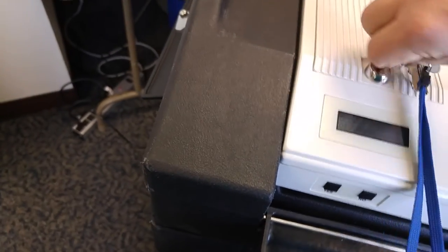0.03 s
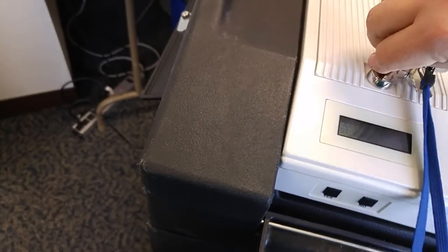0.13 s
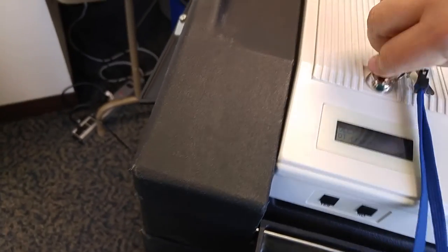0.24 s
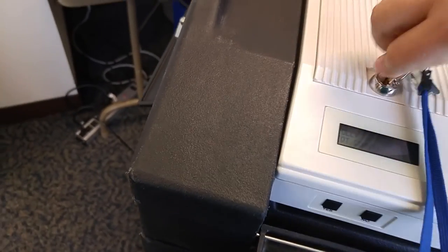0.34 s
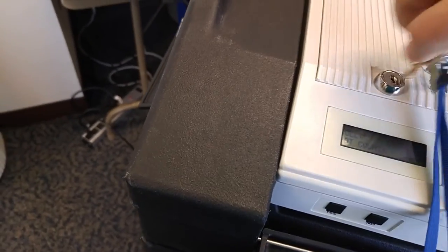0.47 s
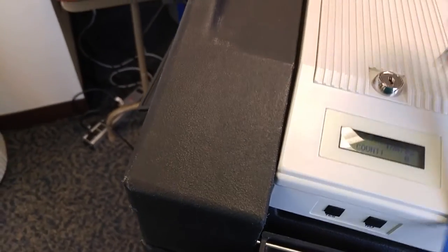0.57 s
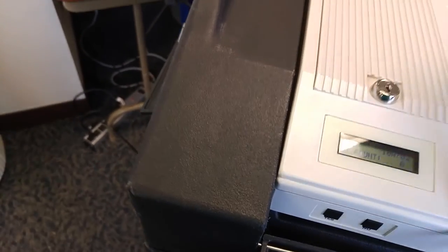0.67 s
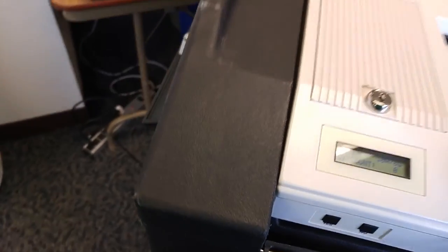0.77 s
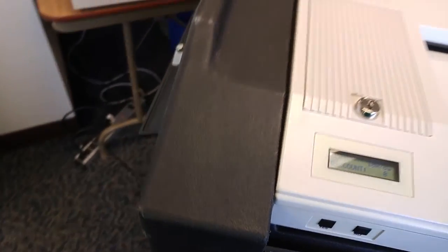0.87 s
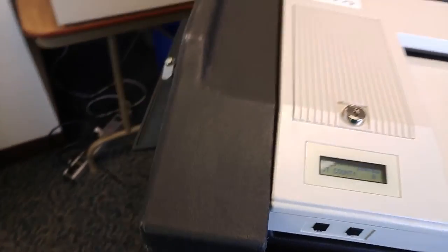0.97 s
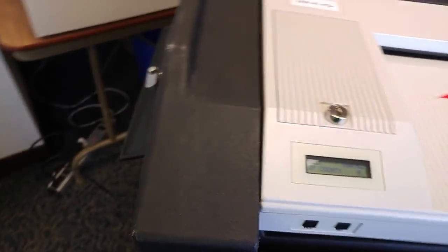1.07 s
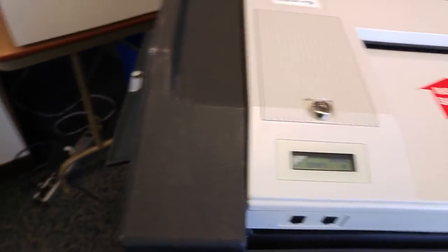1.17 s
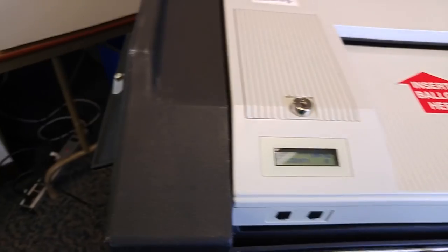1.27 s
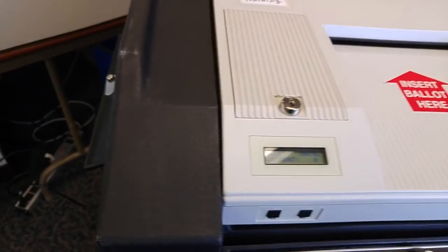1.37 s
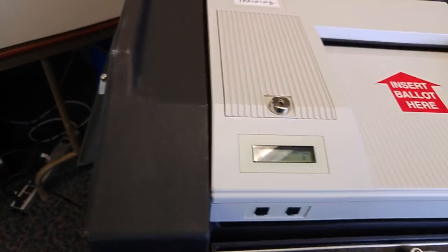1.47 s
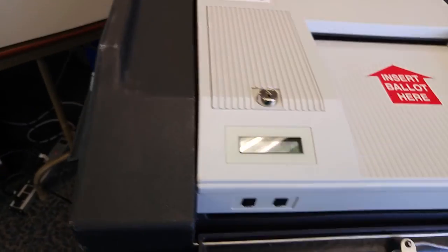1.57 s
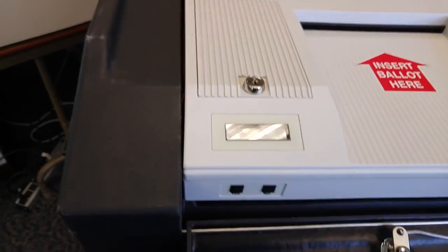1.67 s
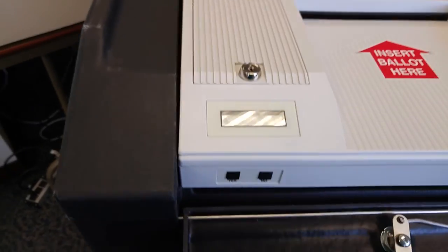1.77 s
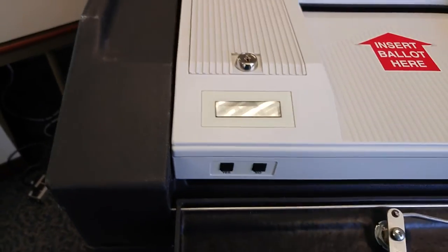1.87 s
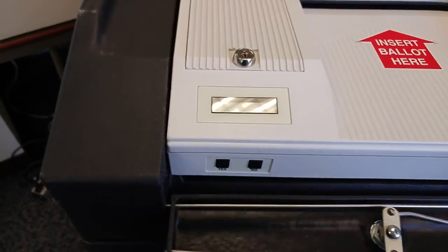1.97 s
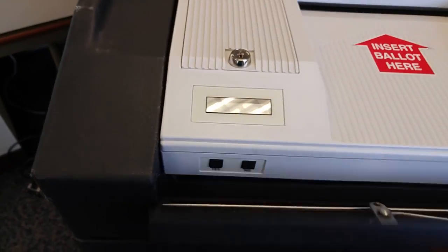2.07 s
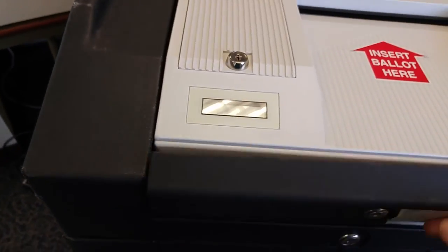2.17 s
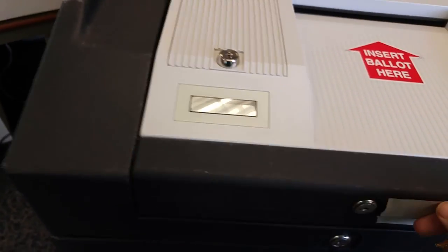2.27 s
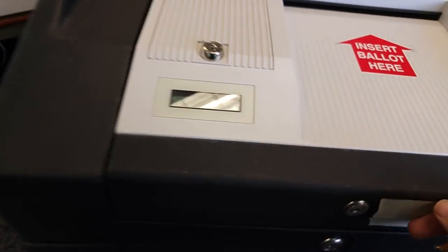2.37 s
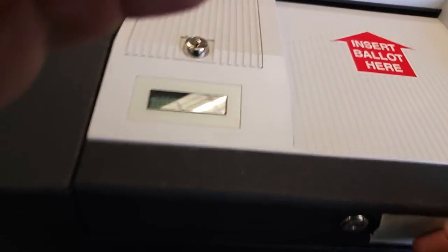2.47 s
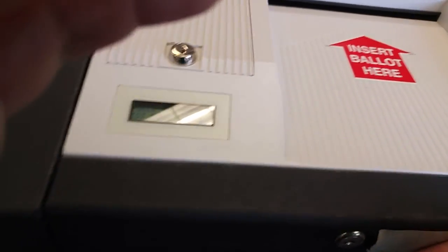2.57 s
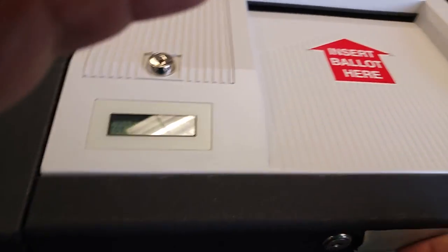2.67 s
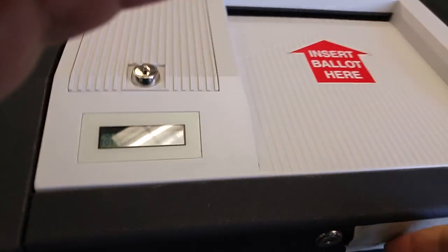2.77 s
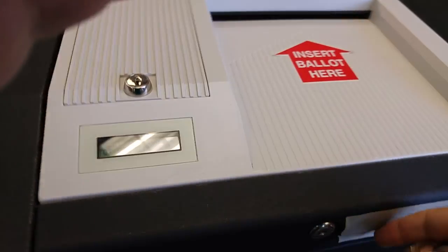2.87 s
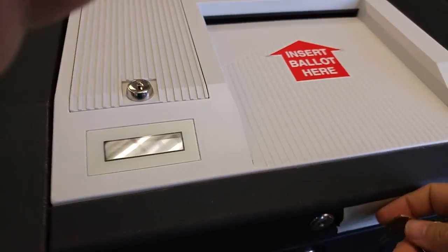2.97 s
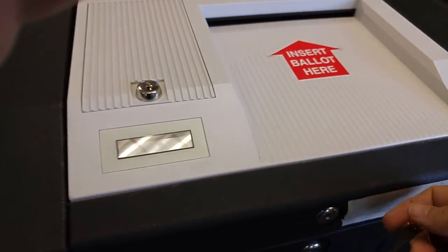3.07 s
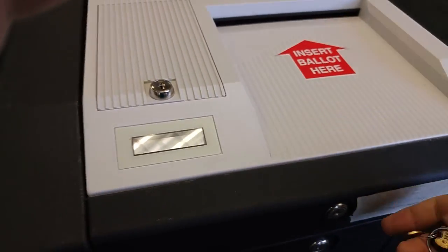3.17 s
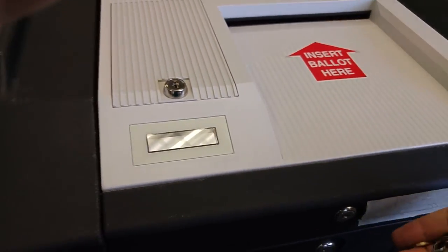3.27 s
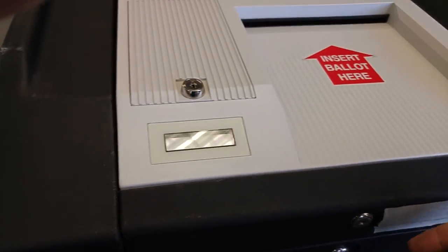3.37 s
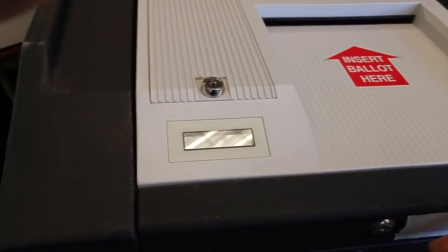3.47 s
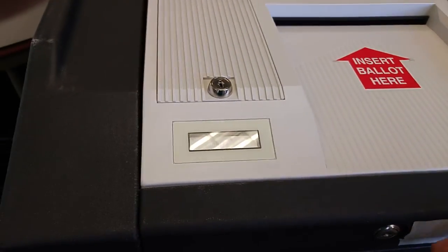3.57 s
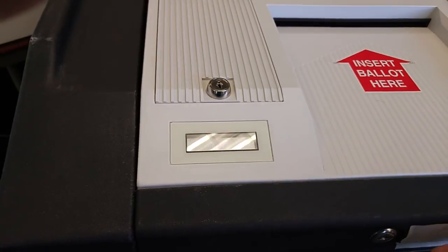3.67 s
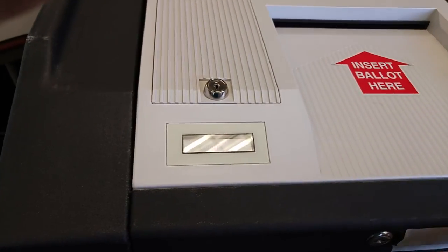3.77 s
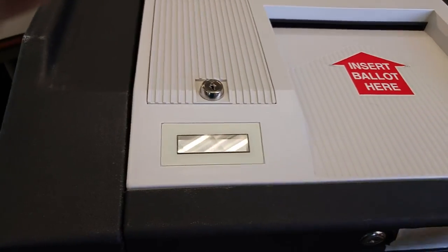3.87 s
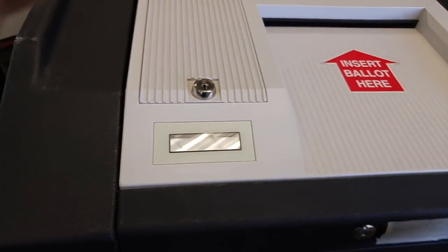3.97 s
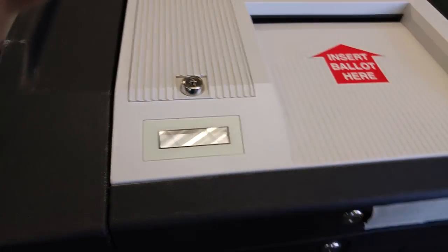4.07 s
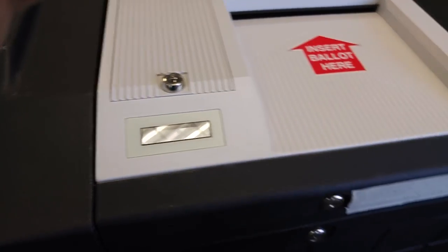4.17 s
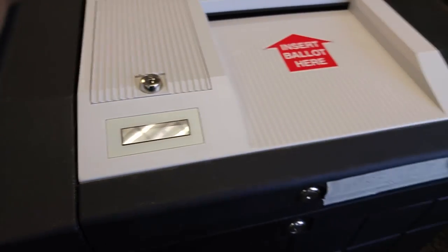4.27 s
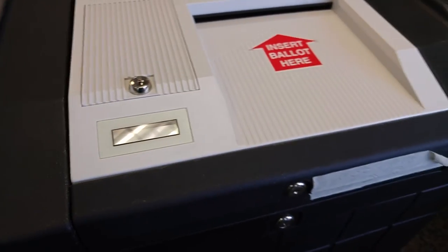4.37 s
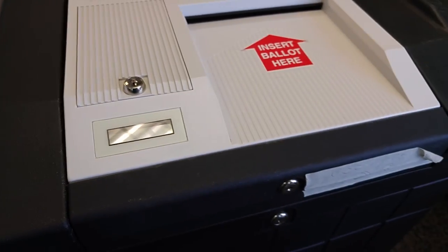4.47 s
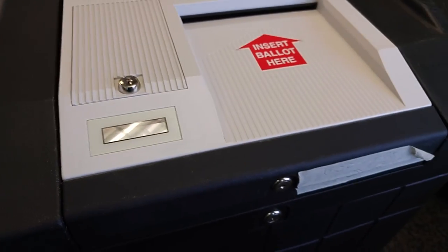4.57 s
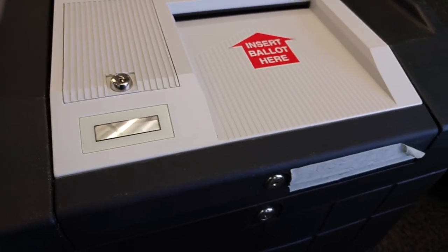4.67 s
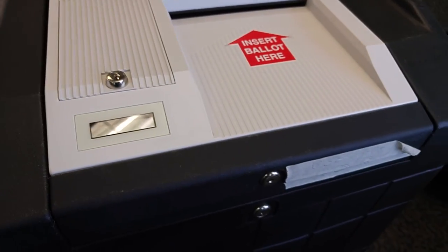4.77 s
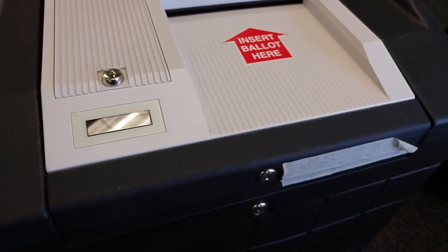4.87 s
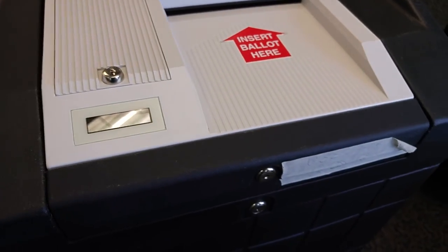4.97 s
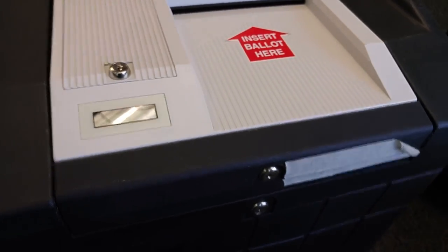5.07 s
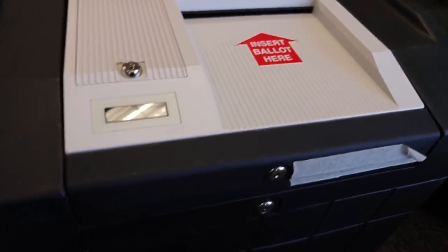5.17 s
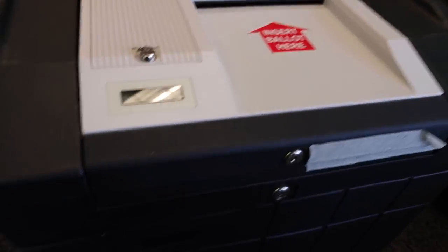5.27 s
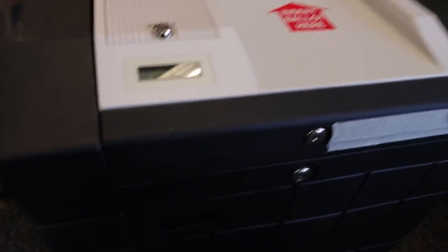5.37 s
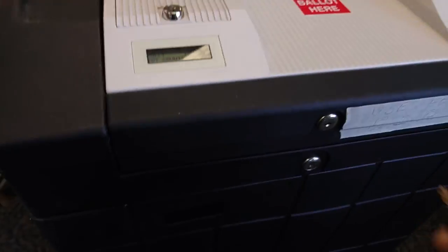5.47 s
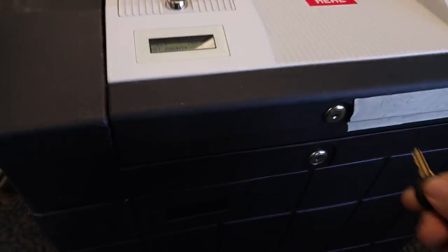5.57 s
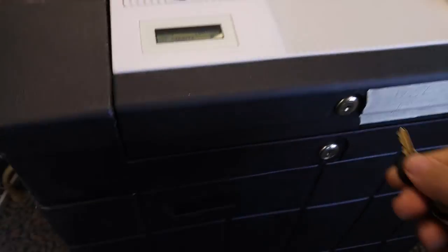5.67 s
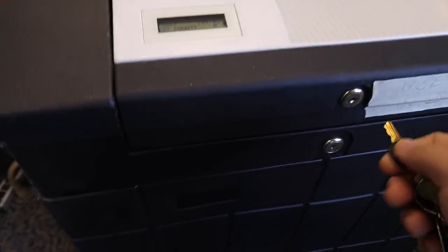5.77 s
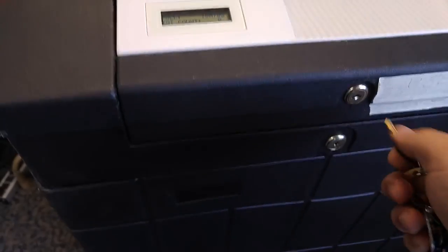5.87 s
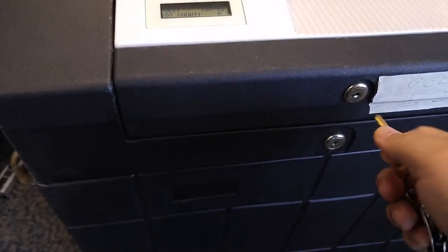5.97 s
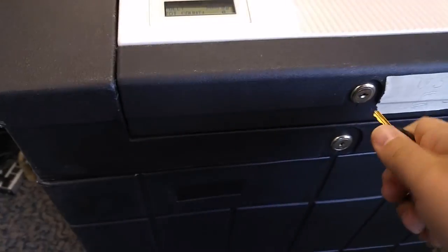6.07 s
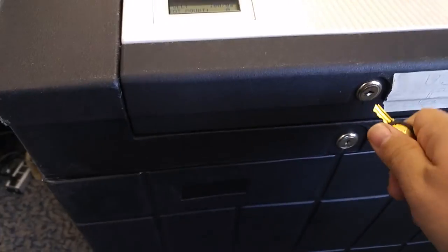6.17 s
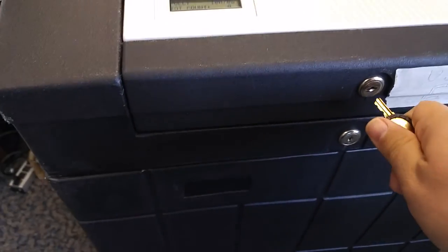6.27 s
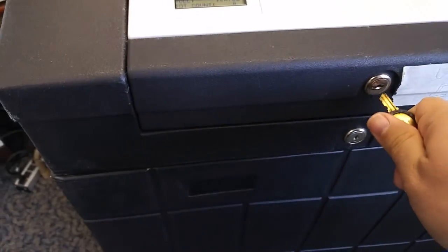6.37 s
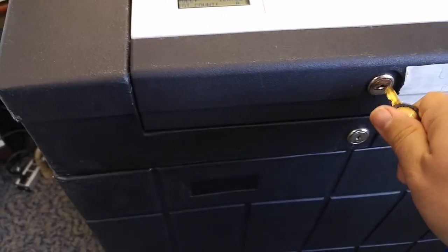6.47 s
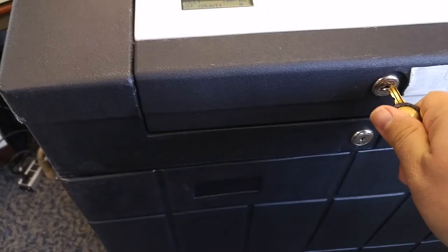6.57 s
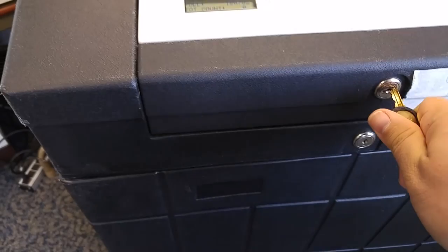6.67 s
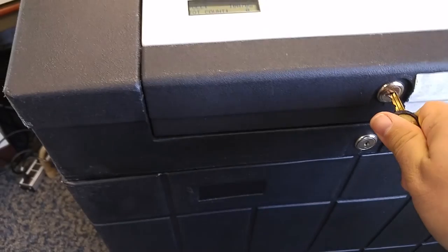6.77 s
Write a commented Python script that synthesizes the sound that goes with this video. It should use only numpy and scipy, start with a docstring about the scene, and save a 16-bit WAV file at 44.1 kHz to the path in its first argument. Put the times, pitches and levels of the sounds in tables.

```python
"""Keys at a plastic cabinet in a carpeted, ventilated room: steady air noise throughout.
A key is worked in a lock and pulled out: catches ring the barrel and panel, the bunch clashes and soft bumps follow.
The flap rattles and knocks shut: noise bursts and decaying modes of latch, flap and hollow body.
A lanyard brush, then keys sorted in the hand: clicks, scrape, chinks and choked ringing partials; another brush.
Last, a key is tapped dully against the next lock and pushed in, with a few catches and a short jingle."""
import sys
import numpy as np
from scipy import signal
from scipy.fft import rfft, irfft, next_fast_len
from scipy.io import wavfile

SR = 44100
rng = np.random.default_rng(int(sys.argv[2]) if len(sys.argv) > 2 else 0)


def output_pcm(signal):
    """Save a mono or channel-first signal as 16-bit PCM at the path in sys.argv[1].

    Samples are clipped to [-1, 1] before scaling.
    """
    pcm = np.clip(np.atleast_2d(signal).T, -1, 1) * 32767
    wavfile.write(sys.argv[1], SR, np.round(pcm).astype(np.int16))


N = 301203

# All levels are relative; the source functions add the final trim.
# Ventilation and hiss spectrum: f/Hz, level/dB
AIR_SPECTRUM = [(25, -45), (65, -17), (120, -25), (175, -10.5), (205, -14), (240, -11), (300, -20.5),
                (365, -13), (510, -34.5), (690, -18.5), (1000, -32), (2000, -41), (4000, -47.5),
                (7500, -45.5), (8600, -36.5), (11500, -52.5), (15500, -58)]
AIR_DB = -48
CUTOFF_HZ = 15900

# Hand bumps: t/s, level/dB
HAND_BUMPS = [(.465, -43.5), (.503, -41.5)]
# Bump spectrum: f/Hz, level/dB
BUMP_SPECTRUM = [(20, -10), (50, 3), (90, -2.5), (300, -44.5)]
# Lanyard brushing the hand: centre t/s, level/dB, 1/e half-width/s
LANYARD_BRUSHES = [(2.407, -53, 0.035), (5.605, -50, 0.036)]

# Dull taps of a firmly gripped key, the last ones on the lock: t/s, level/dB
KEY_TAPS = [(1.865, -46), (4.266, -41.5), (4.288, -38), (6.402, -44), (6.41, -31.5), (6.621, -36),
            (6.624, -28.5), (6.782, -36.5), (6.821, -41.5)]
# Lock barrel with a key against it: f/Hz, level/dB, t60/s
BARREL_MODES = [(735, -0.5, 0.037), (938, -4, 0.058), (1542, 3.5, 0.031), (2000, -14, 0.036),
                (2600, -5, 0.024), (3450, -14.5, 0.053), (5750, -8, 0.027)]
# Key or bolt catching in a lock: t/s, panel level/dB, metal crack level/dB
LOCK_CATCHES = [(.010, -34.5, -37), (.058, -30, -55), (0.107, -31.5, -34), (0.189, -33, -44),
                (.223, -33.5, -54), (0.289, -35.5, -39), (.326, -27.5, -60), (.393, -35, -29.5),
                (.425, -41, -39.5), (.935, -49.5, -49), (1.608, -52, -49), (1.865, -46, -64),
                (6.623, -48, -29), (6.653, -41.5, -66), (6.697, -44.5, -60)]
CATCH_THUD_DB, CATCH_RING_DB = -4.5, -12.5  # hollow body, barrel; re panel

# Flap touching, then seating in its latch: touch t/s, delay to seating/s, body level/dB, latch crack level/dB
FLAP_SLAMS = [(1.939, 0.0034, -31.5, -22), (1.997, 0.0096, -30.5, -20), (2.049, 0.0058, -26, -12),
              (2.108, .008, -17, -5.5), (2.140, 0.0017, -37, -16.5)]
TOUCH_THUD_DB, TOUCH_CLACK_DB, TOUCH_CRACK_DB = -10.5, -1, -7.5  # re slam levels
SEAT_THUD_DB = -2  # re body level
BOUNCE_DELAY_S = .007  # after seating
BOUNCE_THUD_DB, BOUNCE_CLACK_DB, BOUNCE_CRACK_DB = -1.5, -15.5, -15  # re slam levels
# Cabinet walls: f/Hz, level/dB, t60/s
CABINET_WALL_MODES = [(168, -17, .28), (242, -1, .22), (275, -1, .2), (309, 0, .22), (345, -4, .18),
                      (409, -2, .19)]
# Flap: f/Hz, level/dB, t60/s
CABINET_FLAP_MODES = [(605, -6, .14), (641, 0, .22), (703, 0, .21), (760, -6, .14), (842, -3, .17),
                      (945, -8, .16), (1006, -7, .17), (1070, -9, .16), (1437, -11, .1)]
# Metal latch: f/Hz, level/dB, t60/s
METAL_LATCH_MODES = [(4925, 9.5, 0.049), (7550, -1, 0.13), (8350, 7.5, 0.081), (8900, 10, 0.11),
                     (9700, 0.5, 0.15), (15500, -16, .17)]
# Dense, damped noise of the hollow body: f/Hz, level/dB
THUD_SPECTRUM = [(30, -20.5), (60, -12), (130, -9.5), (220, -1.5), (420, 2.5), (520, -5.5), (1000, -25)]
# Same for the panel: f/Hz, level/dB
PANEL_SPECTRUM = [(300, -11), (520, -27.5), (650, 11.5), (900, 2.5), (1300, -2), (1900, -12), (3000, -12),
                  (6000, -28)]
# Same for the metal crack: f/Hz, level/dB
CRACK_SPECTRUM = [(600, 3.5), (1500, 1), (2600, -1), (3500, 1), (5000, 2), (6200, 2.5), (7300, 7.5),
                  (7800, 0.5), (8500, 11), (10000, 2.5), (12000, -1.5), (15500, -15.5)]

# Motion of the bunch: start t/s, end t/s, vigour level/dB, blade clack level re click/dB (high: tight grip)
BUNCH_SHAKES = [(0, 0.437, -44.5, -25), (0.547, 0.63, -46.5, -10), (0.724, 0.92, -38, -13),
                (1.244, 1.554, -60.5, -25), (2.73, 2.933, -56, -12), (3.077, 3.246, -43.5, -21),
                (3.41, 3.485, -44, -20), (3.53, 3.66, -41, -34), (3.864, 3.9, -41.5, -33),
                (4.131, 4.233, -44.5, -47), (4.25, 4.314, -38, -12), (4.643, 4.747, -45.5, -22.5),
                (4.84, 4.926, -39, -28), (5.008, 5.12, -44.5, -21), (5.149, 5.22, -30.5, -31),
                (5.30, 5.692, -62, -6), (6.81, 6.83, -42, -14.5)]
SWELL_DB_PER_S, SETTLE_DB_PER_S = 345, 314  # before and after each shake
RESTLESS_DB, HELD_S = -56.5, (2.7, 5.7)  # vigour floor while in the hand
JOSTLES_PER_S = 36
JOSTLE_DB, JOSTLE_SPREAD_DB = 1.5, 5.5  # re vigour; +/- spread
JOSTLE_TINK_DB = -8  # re click, before spread
# Hard, damped edge-on-edge hits: t/s, level/dB
EDGE_CLICKS = [(.002, -29), (0.084, -31.5), (0.199, -29.5), (.227, -29.5), (.326, -25.5), (.39, -25),
               (0.605, -24.5), (.77, -26), (.879, -25), (0.903, -22.5), (0.933, -26.5), (.95, -30),
               (.98, -36.5), (3.075, -33), (3.51, -25), (3.539, -24), (3.543, -23), (3.553, -24.5),
               (3.605, -26.5), (3.739, -32), (4.133, -36), (4.286, -31), (4.691, -20), (5.02, -25),
               (5.038, -25), (5.112, -25), (5.189, -25), (5.201, -24), (6.624, -27.5)]
CLICK_TINK_DB = -17  # tink re click
# Key swinging free: t/s, tink level/dB, ring level/dB, time until stopped/s
FREE_CHIMES = [(0.388, -35, -33, 0.046), (.584, -38, -47, 0.091), (0.726, -24.5, -30, 0.056),
               (.961, -26.5, -57, .02), (1.314, -62, -54, 0.055), (3.092, -40, -41, 0.028),
               (3.173, -47, -31.5, 0.025), (3.566, -40, -34, .03), (3.59, -24.5, -30, 0.019),
               (3.656, -23, -52, .06), (3.896, -20.5, -43, 0.037), (4.08, -21.5, -45, .03),
               (4.309, -24.5, -35, .03), (4.513, -31.5, -50, 0.027), (4.854, -38, -25, 0.045),
               (4.918, -28, -37, 0.037), (5.087, -36, -29, 0.023), (5.138, -14.5, -18.5, 0.023),
               (5.179, -38, -25.5, 0.089)]
CHIME_CLICK_DB = -14.5  # click re tink
# Key that hangs free: from t/s, key index
FREE_KEY_ORDER = [(0, 2), (.54, 0), (.66, 2), (4.8, 1), (5, 2), (5.125, 0)]
# Partials of three keys, one list per key: f/Hz, level/dB, t60/s
KEY_PARTIALS = [
    [(2900, -22, .16), (5860, -1, .2), (11420, -7, .07), (11910, -1, .3), (13835, -8, .3), (14375, -6, .17),
     (15580, -8, .1)],
    [(4130, -11, .06), (4950, -12, .06), (6400, -8, .16), (11520, -1, .14), (12380, -3, .16),
     (13020, -7, .16), (13880, -5, .2), (15560, -7, .12)],
    [(11300, -8, .12), (11950, -7, .2), (13880, -6, .22), (14420, -1, .18), (14600, -7, .08)],
]
# Short bright tink of finger-damped keys: f/Hz, level/dB, t60/s
TINK_PARTIALS = [(8160, 0, .16), (8480, -9, .08), (8700, -12, .06)]
# Dull bending of the key blades: f/Hz, level/dB, t60/s
BLADE_MODES = [(2077, 10, 0.036), (2256, 12, 0.013), (2900, 7, 0.018), (2870, 8, 0.0065), (4320, 10, 0.015)]
# Metal-on-metal contact spectrum: f/Hz, level/dB
CLICK_SPECTRUM = [(500, -50), (1500, -19), (3400, -17), (5000, -9.5), (6200, -2.5), (7300, 0), (7750, -4),
                  (8400, 9.5), (9500, 2), (11000, -3.5), (13000, -6), (15500, -8)]
TICK_CLACK_DB = -3.5  # blade bending by tiny chinks


def from_db(db):
    """Decibels to gain."""
    return 10 ** (np.asarray(db) / 20)


def rms_one(x):
    """Scale to unit rms."""
    return x / np.sqrt(np.mean(x ** 2) + 1e-20)


def colour(x, spectrum):
    """Minimum-phase filter through spectrum points; white noise keeps its power."""
    size = 2 * next_fast_len(N // 2 + SR // 4)
    hz, db = np.transpose(spectrum)
    bin_hz = np.arange(size // 2 + 1) * SR / size
    gain = rms_one(from_db(np.interp(np.log(bin_hz + 1), np.log(hz), db)))
    # folded cepstrum gives the minimum phase
    cepstrum = irfft(np.log(gain))[:size // 2]
    cepstrum[1:] *= 2
    response = np.exp(rfft(cepstrum, size))
    return irfft(rfft(x, size) * response)[:N]


def high_pass(x, low_hz):
    """Small bodies radiate little bass: second-order high-pass."""
    return signal.sosfilt(signal.butter(2, low_hz, "high", fs=SR, output="sos"), x)


def add(out, s, sound):
    """Mix a sound in at its time."""
    start = int(np.clip(s * SR, 0, N - 1))
    out[start:start + len(sound)] += sound[:N - start]


def impulses(times, sizes):
    """One-sample push at each time, over a tiny floor."""
    out = np.zeros(N)
    np.add.at(out, np.clip((times * SR).astype(int), 0, N - 1), sizes)
    return out + 1e-18


def bursts(times, db, t60):
    """Each contact frees a decaying puff of noise; overlapping powers add."""
    power_decay = from_db(-60 / (t60 * SR)) ** 2
    power = signal.lfilter([1], [1, -power_decay], impulses(times, from_db(db) ** 2))
    return np.sqrt(power) * rng.standard_normal(N)


def partial(hz, t60, free_s=np.inf):
    """Decaying sine, choked around free_s when the part comes to rest against another."""
    length_s = np.clip(min(t60, 2 * free_s), .005, .5)
    t = np.arange(int(length_s * SR)) / SR
    choke = np.exp(-(t / free_s) ** 3)
    return from_db(-60 * t / t60) * choke * np.sin(2 * np.pi * hz * t)


def strike(times, db, modes, grip=0, free_s=np.inf, scatter_db=2):
    """Each blow rings all modes with random strength and sign; grip is the +/- relative detuning."""
    out = np.zeros(N)
    total = np.sqrt(sum(from_db(level) ** 2 for _, level, _ in modes) / 2)
    stop_s = np.broadcast_to(free_s, len(times))
    for hz, level_db, t60 in modes:
        chance = rng.uniform(-1.0, 1, (len(times), 3))
        for s, blow_db, free, (size, sign, tuning) in zip(times, db, stop_s, chance):
            gain = from_db(blow_db + level_db + scatter_db * size) * np.sign(sign)
            add(out, s, gain * partial(hz * (1 + grip * tuning), t60, free))
    return out / total


def chinks(times, db, t60, count=7):
    """Each touch wakes brief partials at random frequencies, new ones for every contact."""
    out = np.zeros(N)
    t = np.arange(int(np.clip(t60, .005, .06) * SR)) / SR
    fade = from_db(-60 * t / t60) / np.sqrt(count)
    signs = (-1.) ** np.arange(count)
    partials_hz = rng.uniform(2700, 15800, (len(times), count))
    for s, touch_db, hz in zip(times, db, partials_hz):
        tones = signs @ np.sin(2 * np.pi * np.outer(hz, t))
        add(out, s, from_db(touch_db) * fade * tones)
    return out


def ventilation():
    """Steady ventilation and hiss: coloured noise."""
    return from_db(AIR_DB) * colour(rng.standard_normal(N), AIR_SPECTRUM)


def room(x, t60=0.36, wall_hz=4500, wet_db=-17):
    """Direct sound plus a weak diffuse tail, dulled by carpet and furniture."""
    t = np.arange(SR // 2) / SR
    tail = rng.standard_normal(len(t)) * from_db(-60 * t / t60) * (t > .006)
    tail /= np.sqrt(np.sum(tail ** 2))
    tail = signal.sosfilt(signal.butter(1, wall_hz, fs=SR, output="sos"), tail)
    return x + from_db(wet_db) * signal.fftconvolve(x, tail)[:N]


def hand():
    """Deep, soft handling bumps and the lanyard brush: noise with decaying and bell-shaped levels."""
    s, db = np.transpose(HAND_BUMPS)
    t = np.arange(N) / SR
    stroke = sum(from_db(level) * np.exp(-((t - at) / width_s) ** 2)
                 for at, level, width_s in LANYARD_BRUSHES)
    cloth = stroke * rng.standard_normal(N)
    bumps = colour(bursts(s, db, t60=0.28), BUMP_SPECTRUM)
    return bumps + colour(cloth, PANEL_SPECTRUM) + colour(cloth, CRACK_SPECTRUM)


def lock():
    """A pinched key taps dully; each catch rings the barrel, pitch varying with where the key sits."""
    s, db = np.transpose(KEY_TAPS)
    catch_s, panel_db, _ = np.transpose(LOCK_CATCHES)
    barrel = strike(catch_s, panel_db + CATCH_RING_DB, BARREL_MODES, grip=0.17)
    tap_ring = strike(s, db - 2.5, BARREL_MODES)
    tap_noise = colour(bursts(s, db - 3, t60=0.029), CRACK_SPECTRUM)
    return tap_ring + tap_noise + barrel


def blows():
    """Lock catches, then slam touch, seating and one rebound: t/s, thud/dB, clack/dB, crack/dB."""
    catch_s, panel_db, metal_db = np.transpose(LOCK_CATCHES)
    s, delay_s, body_db, latch_db = np.transpose(FLAP_SLAMS)
    seat_s = s + delay_s
    return np.hstack([
        (catch_s, panel_db + CATCH_THUD_DB, panel_db, metal_db),
        (s, body_db + TOUCH_THUD_DB, body_db + TOUCH_CLACK_DB, latch_db + TOUCH_CRACK_DB),
        (seat_s, body_db + SEAT_THUD_DB, body_db, latch_db),
        (seat_s + BOUNCE_DELAY_S, body_db + BOUNCE_THUD_DB,
         body_db + BOUNCE_CLACK_DB, latch_db + BOUNCE_CRACK_DB)])


def cabinet():
    """Hollow body thuds, flap clacks, metal latch cracks: modes plus damped noise."""
    s, thud_db, clack_db, crack_db = blows()
    thud = strike(s, thud_db - 1.5, CABINET_WALL_MODES)
    thud += colour(bursts(s, thud_db, t60=0.15), THUD_SPECTRUM)
    clack = strike(s, clack_db - 4.5, CABINET_FLAP_MODES)
    clack += colour(bursts(s, clack_db, t60=0.2), PANEL_SPECTRUM)
    crack_noise = bursts(s, crack_db - 1.5, t60=0.042) + bursts(s, crack_db - 19.5, t60=0.23)
    latch = strike(s, crack_db - 11.0, METAL_LATCH_MODES)
    return high_pass(thud + clack + colour(crack_noise, CRACK_SPECTRUM) + latch, 50)


def vigour(t):
    """Motion level of the bunch in dB: each shake swells, holds and settles."""
    start, end, db, _ = np.transpose(BUNCH_SHAKES)[:, :, None]
    swell_db = SWELL_DB_PER_S * np.maximum(start - t, 0)
    settle_db = SETTLE_DB_PER_S * np.maximum(t - end, 0)
    shakes_db = db - swell_db - settle_db
    held_db = np.where((t > HELD_S[0]) & (t < HELD_S[1]), RESTLESS_DB, -np.inf)
    return np.maximum(shakes_db.max(axis=0), held_db)


def tightness(t):
    """Blade clack re click in dB, set by the grip of the nearest shake."""
    start, end, _, clack_db = np.transpose(BUNCH_SHAKES)
    distance_s = np.maximum(start[:, None] - t, t - end[:, None])
    return clack_db[np.argmin(distance_s, axis=0)]


def sliding_keys():
    """Teeth and edges catch: fine scrape noise and many tiny chinks that also bend the blades."""
    scrape = from_db(vigour(np.arange(N) / SR) - 8) * rng.standard_normal(N)
    times = np.flatnonzero(rng.random(N) < 170 / SR) / SR  # mean 170 chinks per s
    tick_db = vigour(times) + rng.uniform(-14, 8, len(times))
    blades = strike(times, tick_db + tightness(times) + TICK_CLACK_DB, BLADE_MODES, grip=.06)
    ticks = bursts(times, tick_db + 6.0, t60=0.0056) + chinks(times, tick_db + 4.0, t60=0.027)
    return colour(scrape + ticks, CLICK_SPECTRUM) + high_pass(blades, 1000)


def ringing_keys():
    """The free key rings until stopped, and buzzes against its neighbours."""
    s, _, ring_db, free_s = np.transpose(FREE_CHIMES)
    since_s, number = np.transpose(FREE_KEY_ORDER)
    which = number[np.searchsorted(since_s, s) - 1]
    ring = np.zeros(N)
    for k, modes in enumerate(KEY_PARTIALS):
        own = which == k
        ring += strike(s[own], ring_db[own] - 1, modes, grip=.001, free_s=free_s[own], scatter_db=3)
    buzz = colour(bursts(s, ring_db - 5.5, t60=0.14), CLICK_SPECTRUM)
    return high_pass(ring, 2700) + buzz


def clashes():
    """Clicks, chimes and random jostling of the bunch: t/s, click/dB, tink/dB."""
    click_s, click_db = np.transpose(EDGE_CLICKS)
    chime_s, tink_db, _, _ = np.transpose(FREE_CHIMES)
    count = int(JOSTLES_PER_S * N / SR)
    when, size, tone = rng.uniform(-1, 1, (count, 3)).T
    jostle_s = (np.arange(count) + .5 + .5 * when) / JOSTLES_PER_S
    jostle_db = vigour(jostle_s) + JOSTLE_DB
    jostle_click_db = jostle_db + JOSTLE_SPREAD_DB * size
    jostle_tink_db = jostle_db + JOSTLE_TINK_DB + JOSTLE_SPREAD_DB * tone
    return np.hstack([(click_s, click_db, click_db + CLICK_TINK_DB),
                      (chime_s, tink_db + CHIME_CLICK_DB, tink_db),
                      (jostle_s, jostle_click_db, jostle_tink_db)])


def clashing_keys():
    """Sharp click with two rebounds, brief chinks, dull blade clack and short tink."""
    s, click_db, tink_db = clashes()
    contact = bursts(s, click_db + 7, t60=0.0093) + chinks(s, click_db + 0.5, t60=0.032)
    for bounce in (1, 2):  # the second later and weaker
        later_s = s + bounce ** 2 * rng.uniform(.001, .003, len(s))
        contact += bursts(later_s, click_db + 3.5 - 8 * bounce, t60=0.0018)
    clack = strike(s, click_db + tightness(s) + 4, BLADE_MODES, grip=.06)
    tink = strike(s, tink_db + 0.5, TINK_PARTIALS, grip=0.0045, free_s=0.011)
    return colour(contact, CLICK_SPECTRUM) + high_pass(clack, 1200) + high_pass(tink, 5700)


def scene():
    """Keys, lock and cabinet in the room, over dry hand noise and steady air."""
    air = ventilation()
    close = lock() + cabinet() + sliding_keys() + ringing_keys() + clashing_keys()
    return (room(close) + hand() + air)[None]


def record(dry):
    """Clip peaks at full scale, then low-pass steeply."""
    low_pass = signal.ellip(10, .2, 70, CUTOFF_HZ, fs=SR, output="sos")
    return signal.sosfilt(low_pass, np.clip(dry, -1, 1))


dry = scene()
out = record(dry)
output_pcm(out)
```